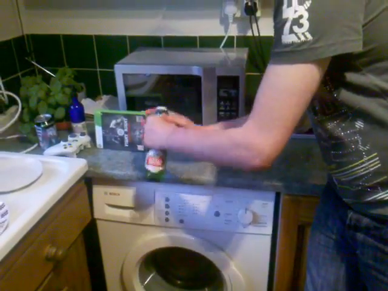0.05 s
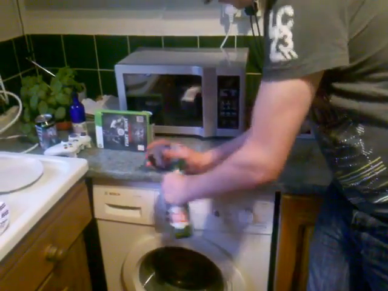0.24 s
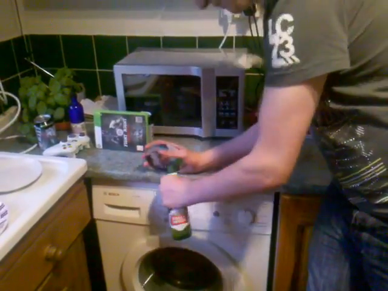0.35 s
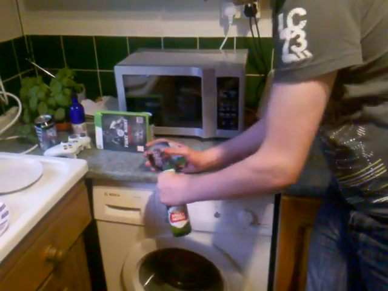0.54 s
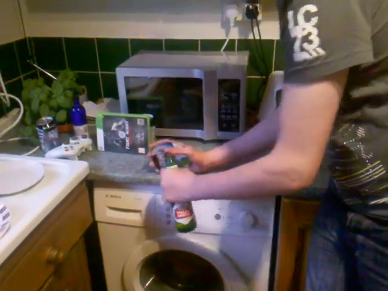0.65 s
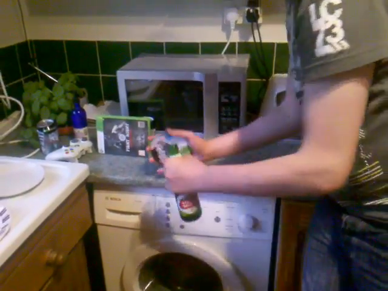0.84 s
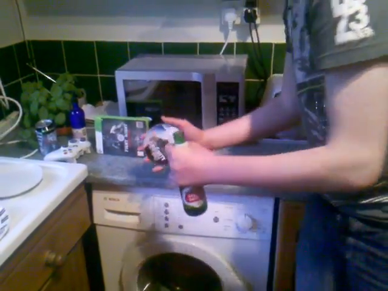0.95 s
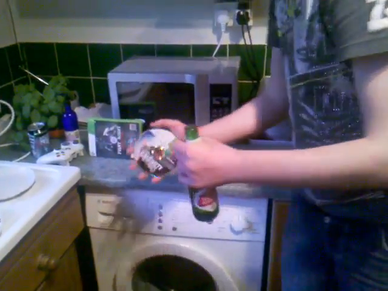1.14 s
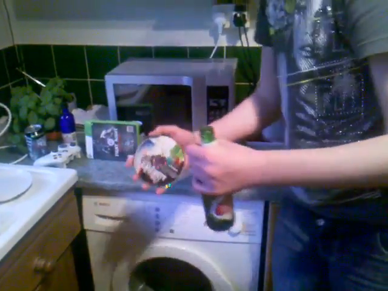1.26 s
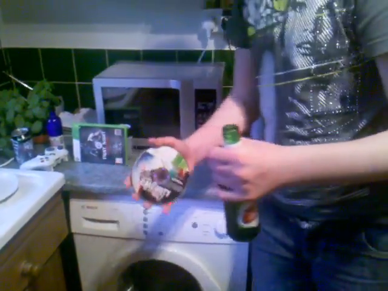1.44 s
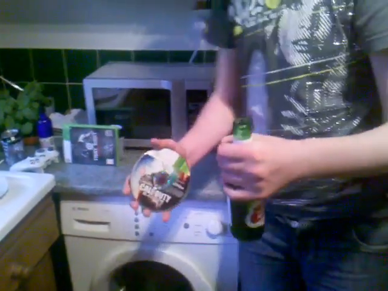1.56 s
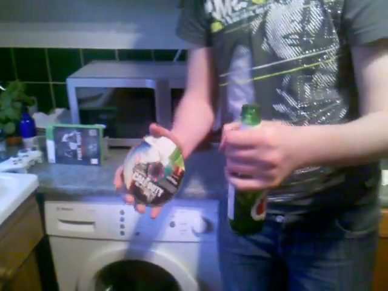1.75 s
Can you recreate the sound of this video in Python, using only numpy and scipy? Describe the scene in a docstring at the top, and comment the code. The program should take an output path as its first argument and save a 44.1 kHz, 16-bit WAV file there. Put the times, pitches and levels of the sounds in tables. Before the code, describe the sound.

A cap pops loudly off a beer bottle in a small tiled kitchen. After a short pause it lands and bounces in quickening, ringing clinks. Faint fizz and rustling lie underneath, and the thin, hissy microphone distorts slightly.

```python
"""Opening a beer bottle

A crown cap is levered off in a small tiled kitchen: a faint scrape, then the gas bursts out.
The cap strikes something hard, drops and bounces to rest, its steel shell ringing near 5 kHz at
every blow. Clothes rustle and a faint fizz lies underneath. The loudest blows clip the converter."""
import sys
import numpy as np
from scipy import signal
from scipy.fft import rfft, irfft
from scipy.io import wavfile

SR = 44100
rng = np.random.default_rng(int(sys.argv[2]) if len(sys.argv) > 2 else 0)


def materialize(psi):
    """Save the field psi as 16-bit PCM at rate SR to the path in sys.argv[1].

    A 1-D psi becomes a single channel; in a 2-D psi each row is a channel.
    """
    bounded = np.clip(np.atleast_2d(psi).T, -1, 1)
    quanta = np.round(bounded * 32767).astype(np.int16)
    wavfile.write(sys.argv[1], SR, quanta)


N = 79380
TIME_S = np.arange(N) / SR
GRID_HZ = np.fft.rfftfreq(2 * N, 1 / SR)
POP_S = .2445


def amp(db):
    """Decibels to gain."""
    return 10 ** (np.asarray(db) / 20)


def along(points, hz=GRID_HZ):
    """Interpolate (Hz, value) points on a log frequency axis."""
    points_hz, values = np.transpose(points)
    return np.interp(np.log(hz + 1), np.log(points_hz + 1), values)


def filtered(x, response):
    """Apply a response given on GRID_HZ."""
    return irfft(rfft(x, 2 * N) * response)[:N]


def click(gain_db):
    """Minimum-phase pulse with this spectrum."""
    cepstrum = irfft(np.log(amp(gain_db) + 1e-6))
    cepstrum[1:N] *= 2
    cepstrum[N + 1:] = 0
    return irfft(np.exp(rfft(cepstrum)))[:N]


def noise(colour):
    """Coloured noise of rms 1."""
    x = filtered(rng.standard_normal(N), amp(along(colour)))
    return x / x.std()


def at(start_s, x):
    """Delay x to start_s."""
    return np.pad(x, (max(round(start_s * SR), 0), 0))[:N]


def fade(t60_s):
    """Exponential decay from time zero."""
    return amp(-60 * TIME_S / t60_s)


def mode(hz, db, t60_s, attack_s=.00047):
    """Damped sine with a soft start."""
    return amp(db) * np.sin(2 * np.pi * hz * TIME_S) * (1 - np.exp(-TIME_S / attack_s)) * fade(t60_s)


def kitchen(x, room_db, onset_s=.0033):
    """Diffuse tail off the tiles, dying faster in the treble."""
    # Each row: frequency in Hz, T60 in seconds.
    decay_times = [(120, .55), (300, .46), (1000, 0.37), (2500, 0.34), (5000, 0.32), (7500, 0.31)]
    hz, t, spectra = signal.stft(rng.standard_normal(N), SR, nperseg=256)
    decay = amp(-60 * t / along(decay_times, hz)[:, None])
    tail = signal.istft(spectra * decay, SR, nperseg=256)[1][:N]
    tail *= 1 - np.exp(-(TIME_S / onset_s) ** 2)
    return amp(room_db) * signal.fftconvolve(x, tail / np.linalg.norm(tail))[:N]


def rustle():
    """Arms and clothes move: dull noise that swells and sinks."""
    # Each row: time in seconds, level in dB.
    levels = [(0, -82.5), (.4, -78), (.6, -56.5), (.78, -68), (.87, -61), (1.0, -81), (1.4, -94),
              (1.8, -67.5)]
    # Each row: frequency in Hz, gain in dB.
    colour = [(60, -20), (150, -7), (280, -0.5), (500, -9), (1100, -12.5), (2500, -26), (7000, -34.5)]
    return noise(colour) * amp(np.interp(TIME_S, *np.transpose(levels)))


def ticks():
    """Brief clicks: small handling taps and faint ticks, possibly recorder glitches."""
    # Each row: start in seconds, level in dB.
    clicks = [(0.024, -35.5), (.2395, -17.5), (0.3168, 8), (0.667, -29.5), (1.0175, -19.5), (1.667, -29)]
    # Each row: frequency in Hz, gain in dB.
    colour = [(100, -5), (600, -8), (2500, -2.5), (5000, -11), (7000, -2)]
    tick = click(along(colour))
    return sum(at(start_s, amp(db) * tick) for start_s, db in clicks)


def rubs():
    """Hands and opener scrape the bottle: gated friction noise."""
    # Each row: start in seconds, length in seconds, level in dB.
    strokes = [(0.182, 0.18, -61), (0.823, 0.033, -66.5)]
    # Each row: frequency in Hz, gain in dB.
    colour = [(80, -17.5), (350, 3.5), (800, 1), (2000, -0.5), (3500, -6.5), (4800, -3.5), (7000, -13.5)]
    gate = sum(amp(db) * ((TIME_S > start_s) & (TIME_S < start_s + length_s))
               for start_s, length_s, db in strokes)
    return noise(colour) * gate


def pop(snap_db=28, puff_db=-.5):
    """The seal snaps open and a short puff of gas follows."""
    # Each row: frequency in Hz, gain in dB.
    colour = [(30, -17.5), (90, -24.5), (135, -8.5), (280, -0.5), (430, -2.5), (570, 3.5), (780, -3.5),
              (1700, 2.5), (2500, -5.5), (3700, -9), (4600, -9), (6000, -15), (7500, -26)]
    snap = click(snap_db + along(colour))
    gas = rng.standard_normal(N) * fade(t60_s=.083)
    puff = signal.fftconvolve(gas / np.linalg.norm(gas), snap)[:N]
    return at(POP_S, snap + amp(puff_db) * puff + kitchen(snap, room_db=5.5))


def shell(x):
    """Whatever shakes the cap rings its steel shell."""
    # Each row: resonance in Hz, width in Hz, gain in dB.
    resonances = [(4970.6, 71, 20), (5079.6, 72, 19.5), (5186, 200, 11)]
    response = 1
    for k, (hz, width_hz, db) in enumerate(resonances):
        damping = 1j * GRID_HZ * width_hz
        response += (-1) ** k * amp(db) * damping / (hz ** 2 - GRID_HZ ** 2 + damping)
    return filtered(x, response)


def fizz():
    """Faint high sizzle after the pop, probably the beer."""
    # Each row: time in seconds, level in dB.
    levels = [(.25, -78.5), (.8, -76.5), (.97, -63), (1.3, -62.5), (1.8, -58)]
    # Each row: frequency in Hz, gain in dB.
    colour = [(1500, -30), (3200, -7.5), (4600, 1.5), (5500, -5), (7000, -13)]
    return noise(colour) * amp(np.interp(TIME_S, *np.transpose(levels))) * (TIME_S > POP_S)


def cap_bounces(skirt_db=16, direct_knock_db=-7, reflection_db=-16, reflection_s=.012):
    """At each contact the cap clinks, pings and knocks on the surface."""
    # Each row: start in seconds, clink level in dB, clink centre and width in Hz,
    # then ping, knock and room levels in dB.
    contacts = [(1.0187, 14, 4393, 850, -8, 4.5, -0.5), (1.3288, 20, 4734, 540, -10, -2, 5),
                (1.4424, 17, 4258, 540, -3, -10.5, 1.5), (1.4915, 12.5, 4290, 518, -28, -32, 2.5),
                (1.5543, 9, 4090, 707, -31.5, -38, 4)]
    # Each row: frequency in Hz, gain in dB.
    knock_colour = [(40, -58), (100, -40), (160, -14), (300, -3), (700, -5.5), (1800, 1.5), (2700, 0),
                    (4000, 5.5), (5600, 4), (6600, 9.5), (7300, -6.5)]
    # A ring near 2.1 kHz, and a faint thin whistle at the recorder's band edge.
    # Each row: frequency in Hz, level in dB, T60 in seconds.
    lingering_tones = [(2146, -42, 0.35), (7260, -54.5, 0.75)]
    knock = click(along(knock_colour))
    tones = sum(mode(*row) for row in lingering_tones)
    out = np.zeros(N)
    for start_s, clink_db, centre_hz, width_hz, ping_db, knock_db, room_db in contacts:
        detuning = (GRID_HZ - centre_hz) / width_hz
        clink = click(clink_db - skirt_db * np.log10(1 + detuning ** 4))
        metal = clink + mode(hz=4837, db=ping_db, t60_s=.012)
        direct = metal + amp(knock_db + direct_knock_db) * knock  # most knock comes via the walls
        reflection = amp(reflection_db) * at(reflection_s, direct)  # off a near surface
        tail = kitchen(metal + amp(knock_db) * knock, room_db)
        out += at(start_s, direct + reflection + tail + amp(knock_db) * tones)
    return out


def scene():
    """Pop and bounces ring the cap; ticks, rubs, rustle and fizz lie underneath."""
    cap = shell(pop() + cap_bounces())
    small_sounds = ticks() + rubs()
    return (cap + small_sounds + kitchen(small_sounds, room_db=-8) + rustle() + fizz())[None]


def record(dry):
    """Thin, hissing microphone; a slow converter clips and aliases; the output saturates."""
    # Each row: frequency in Hz, gain in dB.
    hiss_colour = [(30, -22), (90, -11), (140, 4), (260, 4), (500, -5.5), (1200, -4.5), (3000, -12.5),
                   (4400, -6), (5000, -7), (5600, -11.5), (6700, -10.5), (7500, -25)]
    hiss_db, low_cut_hz, band_hz, top_hz = -68.5, 70, 7200, 16800
    converter_hz, clip_limits = 16000, (-.76, .73)
    output_limit, knee = .72, 24
    low_cut = (1j * GRID_HZ / (low_cut_hz + 1j * GRID_HZ)) ** 2
    band = 1 / np.sqrt(1 + (GRID_HZ / band_hz) ** 56)
    mic = filtered(dry[0], low_cut) + amp(hiss_db) * noise(hiss_colour)
    sampled = signal.resample(filtered(mic, band), N * converter_hz // SR)
    clipped = np.clip(sampled, *clip_limits)
    upsampled = filtered(signal.resample(clipped, N), band)
    saturated = upsampled / (1 + np.abs(upsampled / output_limit) ** knee) ** (1 / knee)
    return filtered(saturated, GRID_HZ < top_hz)[None]


dry = scene()
out = record(dry)
materialize(out)
```